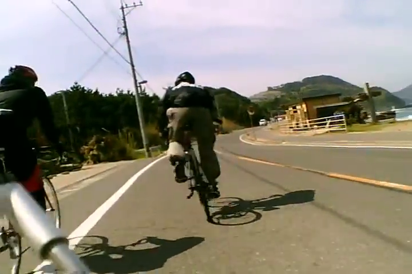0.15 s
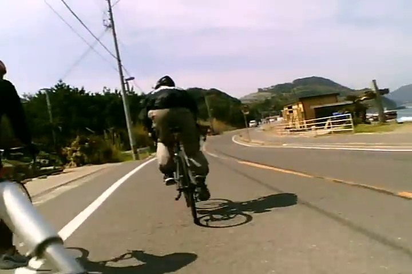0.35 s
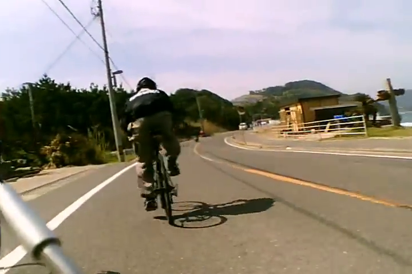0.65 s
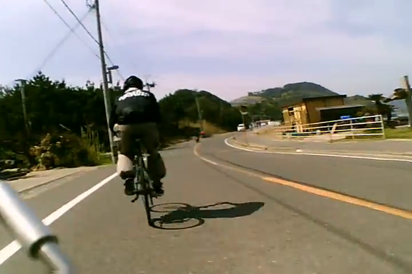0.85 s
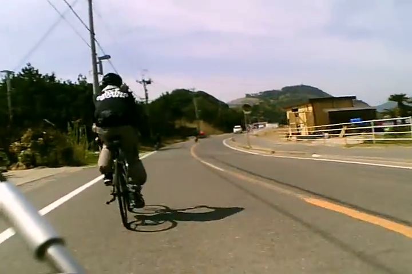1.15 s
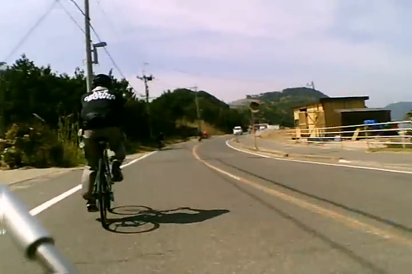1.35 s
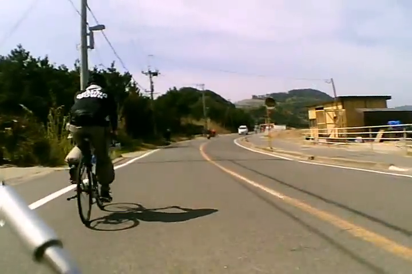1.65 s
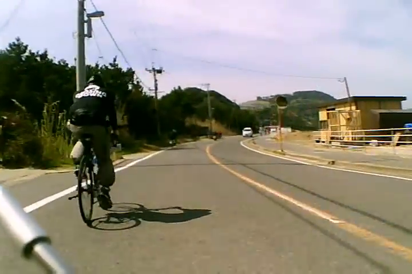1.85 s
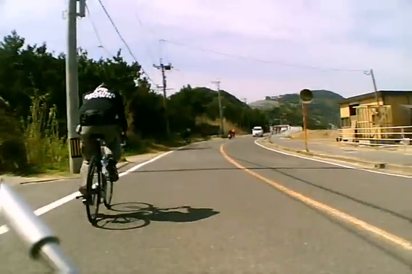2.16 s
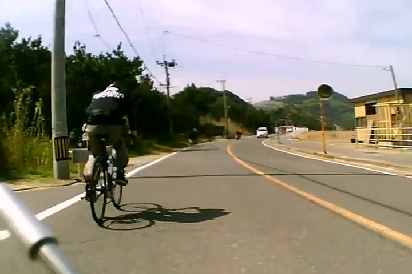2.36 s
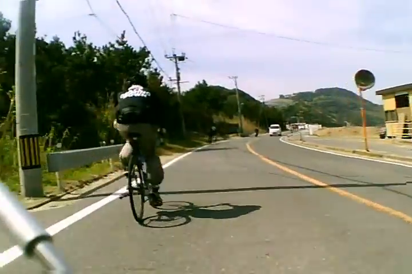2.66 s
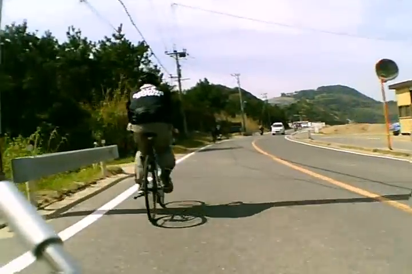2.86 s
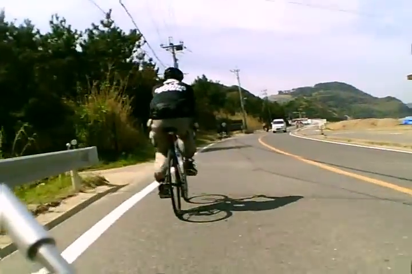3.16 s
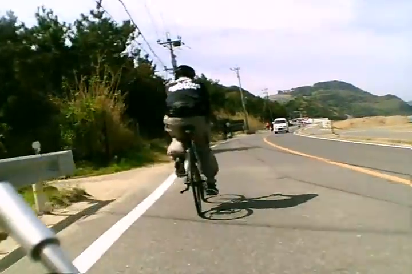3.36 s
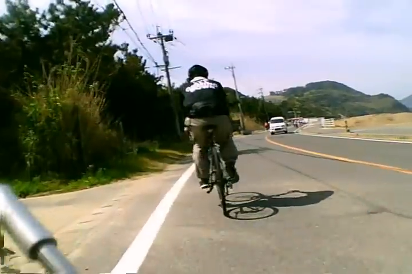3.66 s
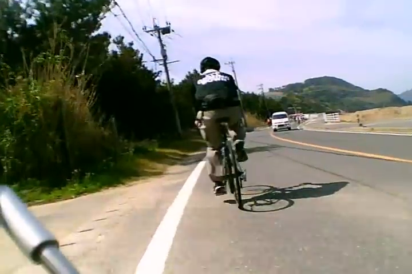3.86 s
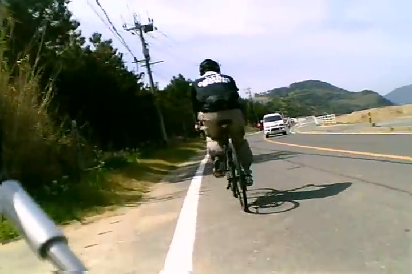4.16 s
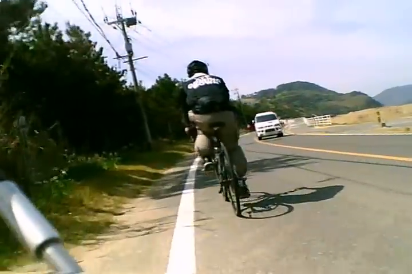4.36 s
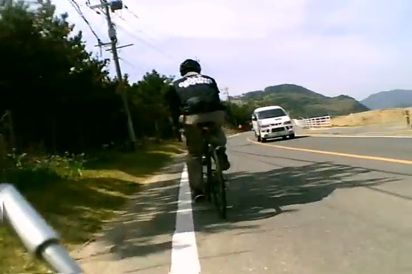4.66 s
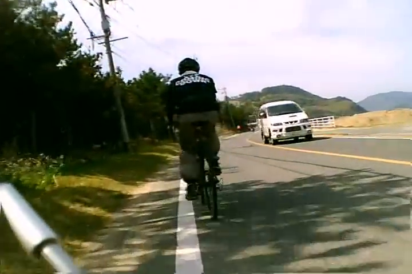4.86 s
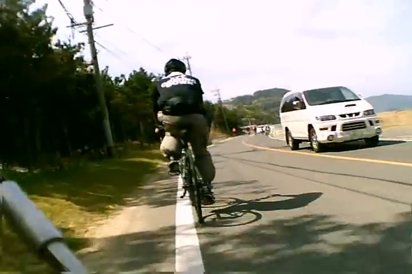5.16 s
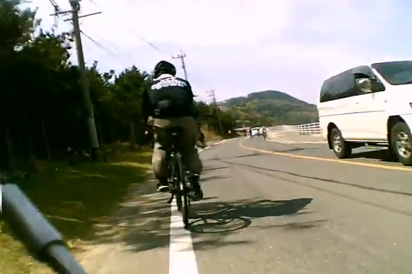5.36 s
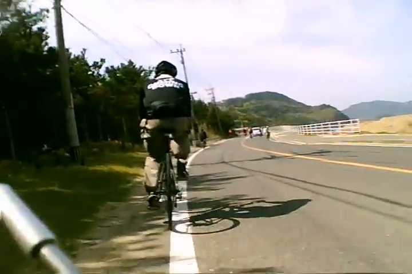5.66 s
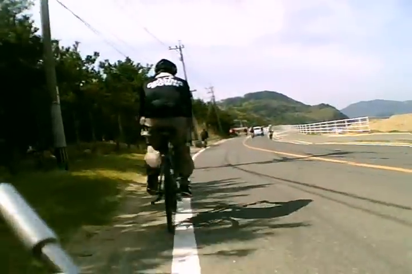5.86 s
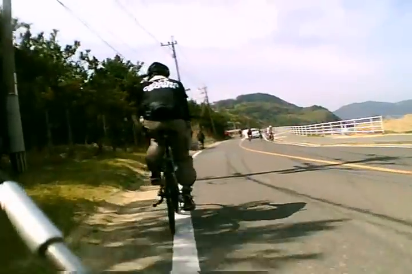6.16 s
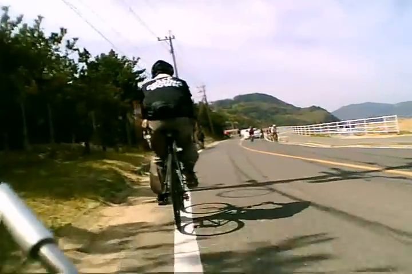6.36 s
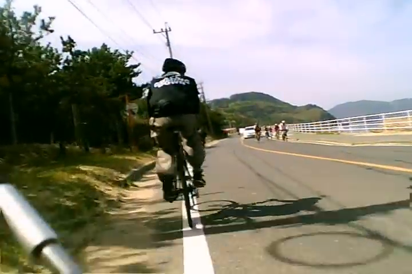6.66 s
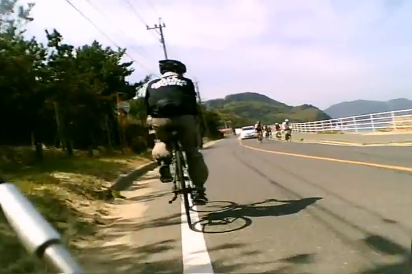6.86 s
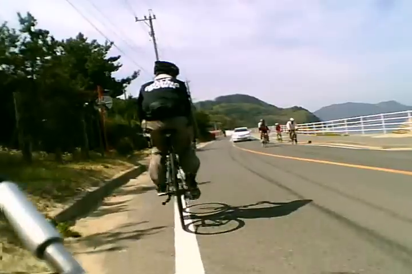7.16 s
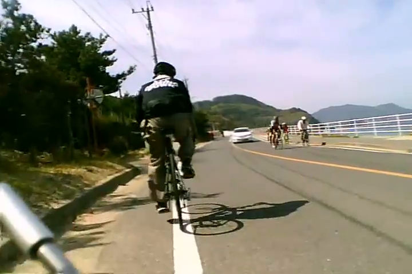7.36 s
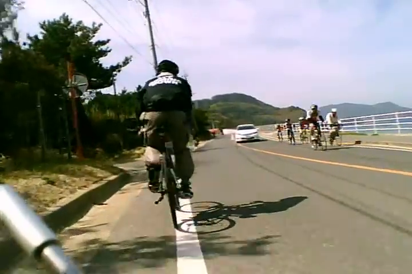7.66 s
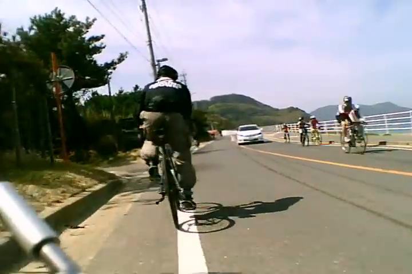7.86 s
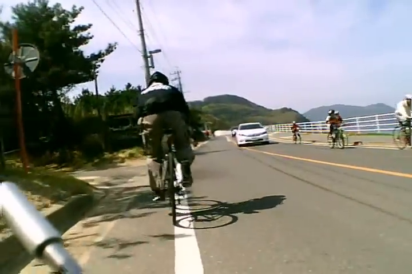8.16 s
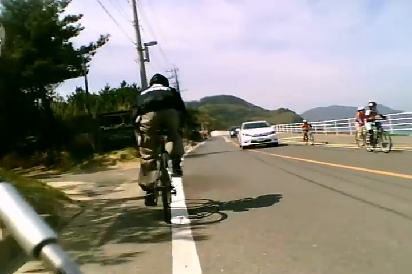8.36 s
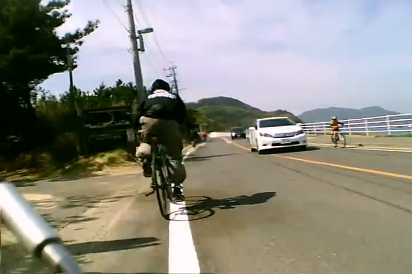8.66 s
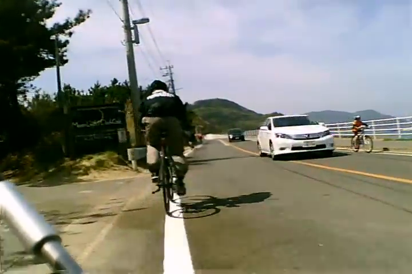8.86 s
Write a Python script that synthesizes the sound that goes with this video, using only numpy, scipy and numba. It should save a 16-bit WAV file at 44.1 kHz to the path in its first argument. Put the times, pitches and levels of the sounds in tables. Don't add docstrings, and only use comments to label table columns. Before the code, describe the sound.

Close, gritty sound from a small microphone clamped to a bicycle on an open asphalt road. From 0 to 1.7 seconds, strong headwind rumbles and slaps the microphone in low, muffled thumps, over rough tyre hum, housing rattle, quick chain ticking and many metallic clicks, with dull knocks around 1.5. Freewheel snaps cluster near 2 seconds; a bright cable clack hits at 2.55. Two hard gusts burst at about 3.0, then wind and road ease, with small stones pinging. Wind thumps return near 4.4 and 5.1. A van's soft tyre roar swells from 5 seconds, peaks at about 5.55 and quickly fades. Around 6 to 7 it is calmest: light clicks and a faint narrow tyre note. A sharp jolt and wind slap strike at 7.15. Moderate buffeting, ticks and pings continue, roughening and growing gustier from 8.6 until 9.

```python
import sys
import numpy as np
from scipy import signal
from scipy.io import wavfile
from scipy.ndimage import uniform_filter1d
from numba import njit

SR = 44100
rng = np.random.default_rng(int(sys.argv[2]) if len(sys.argv) > 2 else 0)


def master_out(mix):
    frames = np.transpose(np.atleast_2d(mix))
    ceiling = np.clip(frames, -1, 1)
    pcm = np.round(ceiling * 32767).astype(np.int16)
    wavfile.write(sys.argv[1], SR, pcm)


def how_loud(loudness_db):
    steps = np.asarray(loudness_db, float) / 20
    return 10 ** steps


N = 396897
T = np.arange(N) / SR

# t/s, level/dB
HEADWIND = [(0, -28.5), (.5, -32), (.92, -27.5), (1.2, -28), (1.85, -33.5), (2.5, -31.5), (3.2, -29.5),
            (3.55, -32.5), (4.0, -29), (4.6, -38), (5.0, -31), (6.0, -38), (6.9, -38.5), (7.3, -32),
            (7.6, -35.5), (8.55, -32), (9.0, -29.5)]
# t/s, level/dB, hold/s
GUSTS = [(0.588, -36, 0.23), (0.82, -31.5, 0.075), (.96, -27, 0.17), (1.183, -38.5, 0.17),
         (1.441, -33.5, 0.16), (1.595, -36, 0.17), (2.27, -29, 0.074), (2.606, -35, 0.051),
         (2.83, -39, 0.0087), (2.961, -18.5, 0.011), (3.046, -19.5, 0.0075), (3.135, -29, 0.12),
         (3.556, -29, 0.016), (3.623, -36.5, 0.054), (4.004, -29, 0.014), (4.34, -29.5, 0.076),
         (4.48, -26.5, 0.026), (4.882, -35, 0.014), (6.215, -47, 0.0094), (7.14, -35.5, 0.019),
         (7.227, -36, .05), (7.76, -29, 0.007), (8.618, -46.5, 0.012), (8.742, -37.5, 0.14),
         (8.838, -27, 0.042), (0.387, -47.5, 0.025), (2.67, -38, 0.0085), (5.997, -47, 0.017),
         (5.04, -39.5, 0.013)]
GUST_RISE_S, GUST_FALL_S = 0.036, 0.048
# t/s, level/dB, hold/s
SHOVES = [(0.035, -19, 0.037), (0.715, -23.5, 0.15), (1.327, -22, 0.034), (1.745, -19, 0.018),
          (2.814, -23.5, 0.58), (3.635, -24.5, 0.36), (4.376, -19, 0.011), (4.55, -24.5, 0.28),
          (5.063, -18, 0.025), (5.204, -35, 0.21), (6.217, -32, .02), (6.64, -33, 0.044),
          (7.155, -23.5, 0.031), (7.693, -28, 0.09), (7.986, -28, 0.018), (8.41, -26.5, 0.095)]
SHOVE_RISE_S, SHOVE_FALL_S = 0.082, 0.092
EDDY_DB, EDDY_PER_WIND = -27, 0.97
# t/s, peak level/dB, length/ms
SLAPS = [(0.246, -28, 11), (0.297, -28, 17), (0.413, -38, 7.7), (0.581, -24, 93), (0.69, -23, 6.1),
         (0.717, -27, 95), (0.809, -19.5, 20), (0.952, -21, 14), (1.016, -18, 14), (1.32, -31, 7.2),
         (1.425, -23, 67), (2.631, -38, 57), (2.958, -29, 5.3), (3.527, -36, 20), (3.55, -25, 10),
         (3.636, -24, 7.9), (3.663, -39, 5), (3.725, -29, 7.5), (4.021, -31, 5.2), (4.372, -30, 7.6),
         (4.492, -33, 31), (4.61, -27.5, 22), (4.708, -30, 15), (5.026, -49, 20), (7.152, -19.5, 8),
         (7.669, -33, 25), (8.416, -25.5, 5.2), (5.065, -28, 4.9), (5.123, -34, 7), (4.955, -31, 7.2),
         (8.85, -35, 30), (8.78, -36, 30), (1.07, -29, 33), (1.25, -34, 26)]
EDGE_DB, EDGE_HZ = 5, 650
# f/Hz, level/dB per Hz
AIR_SPECTRUM = [(3.5, -30), (6.0, 12.5), (20, 5), (74, -10.5), (101, -7), (145, -12), (265, -16),
                (421, -21), (668, -27.5), (1010, -83), (1500, -49), (1950, -87), (3300, -120)]

# t/s, road roughness level/dB, pedal load level/dB
RIDE = [(0, -54, -61), (.35, -58.5, -61), (.58, -54.5, -61), (1.35, -58, -61), (1.65, -54, -56),
        (2.4, -56.5, -59.5), (2.93, -54, -61), (3.36, -60, -63), (4.25, -58.5, -62), (4.59, -63.5, -71.5),
        (5.19, -60, -70.5), (5.46, -61.5, -71), (5.91, -67.5, -71.5), (6.19, -78, -69), (6.5, -65, -73),
        (7.87, -61.5, -69), (8.65, -63, -62.5), (9, -57.5, -61)]
# t/s, level/dB, hold/s
PATCHES = [
    (0.514, -69, .02),
    (1.02, -58, 0.13),
    (1.447, -55, 0.13),
    (2.944, -59.5, 0.016),
    (3.225, -57, 0.018),
    (4.313, -72, 0.12),
    (8.897, -60.5, 0.023),
]
PATCH_RISE_S, PATCH_FALL_S = 0.039, 0.058
# f/Hz, width/Hz, level/dB
TUBES = [(275, 40.6, -0.5), (658.4, 48, -3.5), (801, 160, -16.5), (918.7, 46.6, -7.5), (1023, 82, -12),
         (1320, 160, -29)]
# t/s, level/dB
RING_SWELL = [
    (5.6, 0),
    (6.0, 2.5),
    (8.4, 2.5),
    (8.7, 0),
]
HUM_DB, HUM_PER_ROAD = -50.5, 0.65
# f/Hz, width/Hz, level/dB
HOUSING = [(1675, 190, -0.5), (1979, 142, 10), (2560, 360, -5), (3040, 166, 0.5), (3930, 110, -7.5),
           (4295, 87, -9), (4770, 150, -6), (6400, 450, -23), (7350, 90, -6.5), (8600, 490, -16),
           (9500, 130, -17)]
# f/Hz, width/Hz, level/dB
CHAIN = [(2170, 590, -16), (2843, 150, 9), (4404, 230, 8.5), (4920, 240, 1.5), (6450, 310, 0.5),
         (7530, 1030, -4), (8700, 140, -22), (9700, 500, -8), (12100, 620, -22)]
LINKS_PER_S = 66.5

# f/Hz, width/Hz, level/dB
RINGS = [
    [(2930, 380, -1.5), (3710, 120, 2), (5000, 2900, -4.5), (6550, 170, 3), (8030, 620, -4.5)],
    [(4280, 110, 8.5), (4820, 200, 8)],
    [(2960, 166, 10), (7330, 390, 3), (10260, 280, -4), (11560, 410, -9.5)],
    [(9870, 660, 3), (12330, 550, -1.5)],
]
# t/s, level/dB
SCRAPES = [(1.434, -47), (1.4586, -40), (1.5465, -40), (1.6215, -39.5), (2.5511, -61), (2.6354, -49),
           (2.9272, -49), (3.1117, -51), (3.1547, -48), (3.5295, -47), (3.5858, -46.5), (4.2582, -54),
           (5.1253, -58), (5.3366, -55), (5.4936, -43), (5.6074, -57), (5.6505, -51), (5.697, -50),
           (5.8604, -49), (6.14, -53), (6.1664, -59), (6.459, -51), (6.545, -49), (6.9107, -63),
           (7.1237, -59), (7.393, -48.5), (7.8403, -57), (8.0995, -64), (8.1343, -53), (8.85, -54)]
# t/s, level/dB
SPROCKET = [(0.0598, -40), (0.191, -46), (0.2563, -54), (0.271, -46), (0.5146, -37.5), (0.845, -44),
            (0.9697, -53), (1.0949, -46), (1.7015, -52), (1.8692, -45), (2.5511, -57), (2.589, -53),
            (2.6349, -50), (2.6957, -35), (3.0984, -47), (3.1574, -47), (3.246, -42.5), (3.5857, -54),
            (3.6336, -37), (5.5228, -41), (6.1394, -56.5), (6.6408, -48), (6.9117, -57), (7.124, -52),
            (7.4275, -50), (7.5343, -47), (7.6765, -51), (7.8391, -63), (8.743, -47), (8.8443, -54)]
# t/s, level/dB
PAWL = [(0.2106, -41.5), (0.4653, -50), (0.5062, -56), (0.524, -43.5), (0.6624, -49), (0.7047, -48),
        (0.7505, -46), (0.7828, -49), (0.8023, -48), (0.8599, -46), (0.8754, -41.5), (0.9173, -43),
        (0.9707, -60), (1.3565, -48), (1.4586, -51), (1.6195, -51), (1.8082, -36), (1.868, -48),
        (1.927, -46), (1.9595, -42), (1.9833, -37.5), (2, -42), (2.0824, -45), (2.151, -52), (2.274, -46),
        (2.3755, -56), (2.5511, -62), (2.6973, -55), (3.1557, -51), (3.245, -64)]
# t/s, level/dB
PAWL_LATE = [(4.1813, -50), (4.2272, -53), (4.313, -45.5), (4.8543, -45.5), (5.1241, -54), (5.4928, -54),
             (5.607, -49), (5.6499, -53), (5.9797, -48), (6.0635, -46), (6.1104, -52), (6.1668, -39.5),
             (6.2132, -45), (6.2695, -45.5), (6.3099, -48), (6.9111, -62), (7.8385, -48), (7.8524, -46),
             (7.9033, -51), (8.0974, -54), (8.1757, -44), (8.2924, -45), (8.8507, -53), (8.917, -47)]
# t/s, teeth, level/dB
RUNS = [
    (0.3322, 3, -45),
    (0.889, 1, -42),
    (0.9326, 1, -43),
    (1.469, 3, -43),
    (1.562, 2, -39.5),
    (2.168, 4, -46),
    (5.151, 3, -46),
    (5.618, 2, -49),
]
TOOTH_S = .0146
# t/s, level/dB
CABLE = [(0.4663, -50), (1.5468, -50), (1.6232, -41), (1.806, -43), (1.8265, -38), (1.927, -49),
         (1.9604, -46), (2.5493, -28), (2.6953, -55), (2.8844, -41), (2.9294, -42), (3.9165, -44),
         (4.0771, -46), (4.258, -40), (5.1243, -41), (5.3376, -40.5), (5.4944, -51), (5.6511, -52),
         (6.1404, -56), (6.1667, -58), (6.2138, -59), (6.548, -40), (6.757, -43), (6.9107, -49),
         (6.9664, -42.5), (7.1237, -50), (8.098, -42), (8.1343, -42.5), (8.8513, -36.5), (8.9182, -45)]
# t/s, level/dB
TICKS = [(1.5765, -41), (5.5135, -41), (8.4941, -43), (8.9579, -44), (5.5593, -47), (5.8391, -52),
         (1.506, -41), (6.0242, -53), (6.6, -50), (6.1467, -45), (6.1774, -47), (2.8027, -40), (5.9, -50),
         (7.4, -47), (8.702, -44), (6.7, -52), (7.904, -57), (8.5, -48), (8.14, -46.5), (7.535, -49),
         (7.99, -51), (8.3903, -49), (8.804, -46)]
# t/s, level/dB
PAWL_LIGHT = [(0.2184, -43), (0.302, -41), (0.5358, -33), (0.5761, -49), (0.623, -39), (0.6789, -44),
              (0.9464, -42), (1.152, -43), (1.1667, -40), (1.3972, -38), (1.7614, -38), (1.8384, -42),
              (1.9031, -40), (1.9714, -34), (2.0294, -39), (2.7903, -34), (2.8154, -40), (3.2144, -42),
              (3.3802, -43), (3.6444, -41), (3.678, -40), (3.7504, -46), (4.1185, -40), (4.1316, -40),
              (4.148, -41.5), (4.1624, -47), (4.8893, -44), (5.1374, -39), (5.1964, -47), (5.213, -41.5),
              (5.2375, -52), (5.3554, -51), (5.472, -44), (5.9994, -51), (6.333, -53), (6.3864, -46),
              (6.4817, -45), (7.8027, -45), (8.0546, -39), (8.2162, -41), (8.2332, -42), (8.2521, -43),
              (8.3355, -45)]
# t/s, level/dB
CABLE_LIGHT = [(0.397, -42), (1.7873, -34), (1.8821, -39), (2.3274, -37), (2.7146, -36), (3.5464, -45),
               (3.6975, -35), (3.81, -48), (3.9844, -48), (4.7324, -43), (5.0707, -40), (5.9704, -47),
               (7.3642, -46), (7.5792, -47), (7.655, -50), (7.7263, -43), (8.1674, -42), (8.5824, -48)]
# t/s, level/dB
STONES = [(0.0338, -44), (0.1421, -49), (0.4239, -44), (1.0475, -47), (1.3059, -52), (1.6003, -35),
          (1.6531, -35), (1.6746, -41), (1.7469, -47), (2.0472, -41), (2.1203, -38), (2.5017, -48),
          (2.6633, -41), (2.7312, -38), (2.7496, -41), (2.7736, -39), (2.8449, -36), (2.8544, -38),
          (2.9123, -38), (3.0724, -49), (3.1852, -40), (3.2286, -42), (3.3204, -53), (3.3498, -46),
          (3.4106, -43), (3.7233, -40), (3.9529, -47), (4.0327, -49), (4.0502, -45), (4.0966, -43),
          (4.2153, -51), (4.338, -38), (4.4253, -39), (4.5216, -50), (4.6828, -50), (4.7197, -47),
          (4.7516, -50), (4.9232, -44), (5.0075, -49), (5.0295, -47), (5.2759, -43), (5.5463, -40),
          (5.7084, -44), (6.2814, -45), (6.4272, -41), (6.6498, -36), (6.6972, -46), (6.787, -40),
          (6.8174, -46), (6.9321, -44), (7.0908, -44), (7.448, -45), (7.4879, -51), (7.5537, -41),
          (7.7777, -43), (7.9224, -40), (7.9808, -42), (8.0316, -42)]
# t/s, level/dB
STONES_LATE = [(6.6664, -43), (7.7009, -44), (7.9389, -43), (8.0114, -46), (8.4203, -48), (8.4532, -53),
               (8.5165, -42), (8.5485, -48), (8.6527, -48), (8.7685, -45), (8.8832, -40), (8.968, -33),
               (8.9914, -38)]
LIGHT_DB = [-9.5, -7.5, -10]
NEIGHBOUR_DB, NEIGHBOUR_SCATTER_DB = -15.5, 3.2
# t/s, level/dB
KNOCKS = [(0.522, -36), (0.808, -43), (1.019, -39.5), (1.06, -44), (1.11, -41), (3.225, -42), (3.245, -43),
          (2.98, -45), (1.49, -42), (1.6, -42), (1.63, -41), (1.4582, -42), (1.4746, -38), (1.505, -37),
          (1.5517, -33.5), (1.5793, -35), (1.8257, -35), (1.986, -39), (2.001, -42), (2.081, -42),
          (2.5495, -41), (2.9462, -40), (2.963, -39), (3.6363, -44), (4.756, -48), (5.030, -47),
          (5.066, -45), (5.970, -46), (6.025, -46.5), (6.065, -45), (6.36, -49), (6.43, -53), (6.817, -45),
          (7.805, -51), (8.305, -53), (8.49, -40), (8.801, -42), (8.895, -40), (8.968, -42), (5.123, -42),
          (5.151, -41), (6.164, -43.5), (6.651, -41.5), (7.391, -42), (8.0232, -41.5), (8.096, -44)]
# f/Hz, width/Hz, level/dB
SHELL = [(1207, 150, 5.5), (1830, 360, 5.5), (2180, 310, -1), (2430, 330, 0), (2810, 360, 3),
         (3900, 2000, -6.5)]
# f/Hz, width/Hz, share removed
SHELL_DIPS = [(1510, 150, .35), (3450, 350, .45)]

# t/s, roar peak f/Hz, level/dB
VAN = [
    (4.6, 590, -76),
    (5.3, 670, -47),
    (5.55, 780, -41),
    (5.72, 860, -44),
    (5.82, 900, -55),
]
# f/Hz, level/dB
WHINE = [(5600, -85), (11025, -101)]
# t/s, level/dB, decay/ms
DROPOUTS = [
    (3.2575, -37, .1),
    (4.7235, -38, 6),
    (7.1369, -28.5, 8),
]
OFFSET = -.0182
START_PUSH, START_S = .14, .005


def level(x):
    return x / np.sqrt(np.mean(x ** 2))


@njit
def svf(x, hz, width):
    y, b, l = np.empty(len(x)), 0., 0.
    for i in range(len(x)):
        g, k = np.pi * hz[i] / SR, width / hz[i]
        v = (b + g * (x[i] - l)) / (1 + g * (g + k))
        b, l, y[i] = 2 * v - b, l + 2 * g * v, k * v
    return y


def band(x, hz, width):
    warped_hz = np.tan(np.pi * hz / SR) * SR / np.pi * np.ones(N)
    warped_width = width * (1 + np.tan(np.pi * np.mean(hz) / SR) ** 2)
    return svf(x + 1e-18, warped_hz, warped_width)


def body(x, modes):
    out = 0
    for k, (hz, width, db) in enumerate(modes):
        ring = band(band(x, hz, 1.6 * width), hz, 1.6 * width)
        out = out + (-1) ** k * how_loud(db) * ring
    return out


def walk(rate):
    k = int(SR / rate)
    held = np.repeat(rng.standard_normal(N // k + 1), k)
    return 1.4 * uniform_filter1d(uniform_filter1d(held, k), k)[:N]


def curves(table):
    s, *columns = np.transpose(table)
    return [np.interp(T, s, c) for c in columns]


def bursts(times, db, decay_ms):
    kicks = np.zeros(N)
    onsets = np.clip((np.asarray(times) * SR).astype(int), 0, N - 1)
    np.add.at(kicks, onsets, how_loud(db))
    return signal.lfilter([1], [1, -np.exp(-1000 / (decay_ms * SR))], kicks)


def even(x, ms, depth):
    power = uniform_filter1d(x ** 2 + 1e-12, int(ms * SR / 1000))
    return level(x / power ** (depth / 2))


def swells(base_db, table, rise_s, fall_s):
    extra = 0
    for s, db, hold in table:
        corners = np.cumsum([s - rise_s, rise_s, abs(hold), fall_s])
        extra = extra + how_loud(db) * np.interp(T, corners, [0, 1, 1, 0]) ** 2
    return 20 * np.log10(how_loud(base_db) + extra)


def circuit_whine():
    return sum(how_loud(db + 3 + walk(6)) * np.sin(2 * np.pi * hz * T) for hz, db in WHINE)


def dropouts():
    return sum(bursts([s], db, ms) for s, db, ms in DROPOUTS)


def van():
    hz, db = curves(VAN)
    noise = rng.standard_normal(N)
    roar = level(band(band(noise, hz, 200), hz, 200))
    hiss = level(band(noise, 1900, 350))
    return (roar + 0.16 * hiss) * how_loud(db)


def knocks(decay_ms):
    s, db = np.transpose(KNOCKS)
    return body(bursts(s, db + 6.0, decay_ms) * rng.standard_normal(N), SHELL)


def clicks():
    skips = [(s + k * TOOTH_S, db) for s, teeth, db in RUNS for k in range(round(teeth))]
    parts = [SCRAPES, SPROCKET, list(PAWL) + list(PAWL_LATE) + skips, CABLE]
    light = [PAWL_LIGHT, CABLE_LIGHT, list(STONES) + list(STONES_LATE)]
    light = [np.add(part, [0, db]) for part, db in zip(light, LIGHT_DB)]
    groups = parts + [TICKS] + light
    s, db = np.transpose([row for group in groups for row in group])
    struck = np.repeat([0, 1, 2, 3, 4, 2, 3, 4], [len(group) for group in groups])
    own_db, stirred_db, tick_db = [14.7, 7.0, 11.0, 7.0], [2.3, -1.5, 1.0, -10.0], [7, 5.0, 5.5, -7.0]
    scrape_ms = 2.
    chance = rng.standard_normal((len(s), len(parts)))
    out = 0
    for k, modes in enumerate(RINGS):
        stirred = 15.5 + stirred_db[k] + NEIGHBOUR_DB + NEIGHBOUR_SCATTER_DB * chance[:, k]
        others = np.where(struck == len(parts), tick_db[k], stirred)
        trim = np.where(struck == k, own_db[k], others)
        scrape = bursts(s, db + trim, scrape_ms) * np.sign(rng.standard_normal(N))
        out = out + body(scrape, modes)
    return out + knocks(2.5 * scrape_ms)


def chain(tick_db):
    rate = LINKS_PER_S * (1 + .02 * walk(1.5))
    links = T[1:][np.diff(np.floor(np.cumsum(rate / SR))) > 0]
    grit = rng.uniform(0, N / SR, 1500)
    out = 0
    for hz, width, db in CHAIN:
        chance = rng.standard_normal((2400, 2))
        jitter, strength = chance[:len(links)].T
        ticks = bursts(links + .0015 * jitter, 3.0 * strength, 2.2)
        ticks += bursts(grit, 5 * np.minimum(chance[900:, 1], 2.) - 8, 2.4)
        soft = uniform_filter1d(ticks, size=30)
        ring = band(soft * rng.standard_normal(N), hz, width)
        out = out + how_loud(db + 2.0 * walk(15)) * ring
    return level(out) * how_loud(tick_db + 2.5)


def housing(shake_db):
    jolts = how_loud(2.2 * walk(60) + 2.4 * walk(170) + .4 * walk(12))
    return level(body(rng.standard_normal(N) * jolts, HOUSING)) * how_loud(shake_db + 1.5)


def tyre(hum_db):
    tubes = level(body(rng.standard_normal(N) * how_loud(1.0 * walk(18)), TUBES))
    ring = even(band(rng.standard_normal(N), 578 + 3 * walk(4.6), 20), 60, 0.6)
    swell_db, = curves(RING_SWELL)
    return tubes * how_loud(hum_db + 7.5) + ring * how_loud(0.11 * hum_db - 41 + swell_db)


def slaps(turbulence):
    envelope = sum(bursts([s], db, ms) for s, db, ms in SLAPS)
    s, db, _ = np.transpose(SLAPS)
    edges = band(bursts(s, db, 1), EDGE_HZ, 950) * how_loud(EDGE_DB)
    return envelope * even(turbulence, 12, .7) * how_loud(-2) + edges


def wind():
    wind_db, = curves(HEADWIND)
    eddy_db = EDDY_DB + EDDY_PER_WIND * (wind_db + 35.5)
    slow_db = swells(eddy_db, SHOVES, SHOVE_RISE_S, SHOVE_FALL_S)
    fine_db = swells(wind_db, GUSTS, GUST_RISE_S, GUST_FALL_S)
    air_hz, air_db = np.transpose(AIR_SPECTRUM)
    puff = walk(12)
    big, small, raw = 0, 0, 0
    for hz in 7 * 2 ** np.arange(0, 7.6, .5):
        fine = np.clip(np.log2(hz / 30) / 1.39, 0, 1)
        eddy = level(band(band(rng.standard_normal(N), hz, 0.57 * hz), hz, 0.57 * hz))
        eddy *= how_loud(np.interp(np.log(hz), np.log(air_hz), air_db)) * np.sqrt(hz)
        raw = raw + fine * eddy * (hz / 200) ** 0.6
        eddy *= how_loud(0.032 * np.clip(np.log2(hz / 200), 0, 3) * (fine_db + 20.0))
        eddy *= how_loud(fine * (2.2 * puff + 1.9 * walk(22)))
        big = big + np.sqrt(1 - fine) * eddy
        small = small + np.sqrt(fine) * eddy
    big = even(big, 300, 0.081)
    shed = how_loud(2.5 * (uniform_filter1d(np.abs(big), size=300) - 0.82))
    air = big * how_loud(slow_db + 0.17)
    air = air + even(small, 60, 0.43) * shed * how_loud(fine_db)
    air = air + slaps(raw)
    return signal.sosfilt(signal.butter(5, 1000, fs=SR, output="sos"), air)


def scene():
    road_db, load_db = curves(RIDE)
    road_db = swells(road_db, PATCHES, PATCH_RISE_S, PATCH_FALL_S)
    hum_db = HUM_DB + HUM_PER_ROAD * (road_db + 60.5)
    mix = van() + clicks() + chain(load_db) + housing(road_db) + tyre(hum_db) + wind()
    dips = sum(share * band(mix, hz, width) for hz, width, share in SHELL_DIPS)
    return (mix - dips)[None]


def roll_off(x):
    return signal.sosfilt(signal.butter(12, 12940, fs=SR, output="sos"), x)


def record(dry):
    hiss = how_loud(-90.0) * rng.standard_normal(N)
    x = np.tanh(1.121 * dry) / 1.286 + circuit_whine() - dropouts() + hiss
    x = signal.sosfilt(signal.butter(8, 11700, fs=SR, output="sos"), x)
    mix = x + OFFSET + START_PUSH * np.exp(-T / START_S)
    return roll_off(mix)


dry = scene()
out = record(dry)
master_out(out)
```